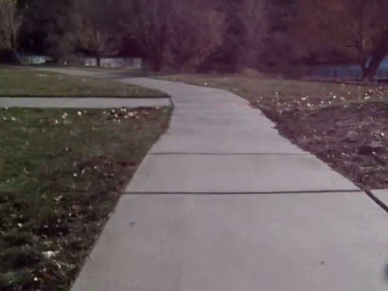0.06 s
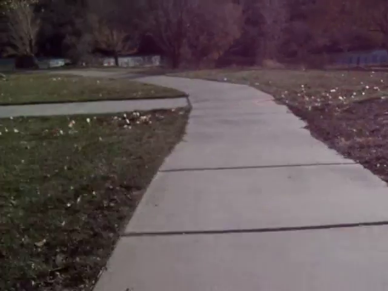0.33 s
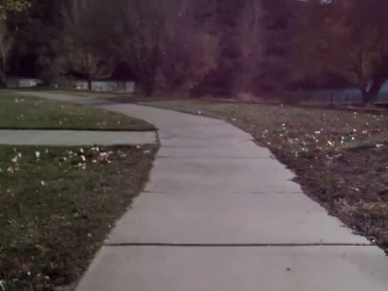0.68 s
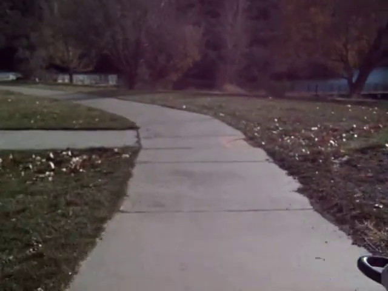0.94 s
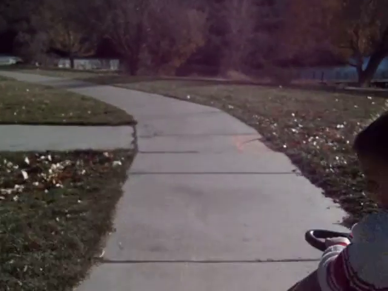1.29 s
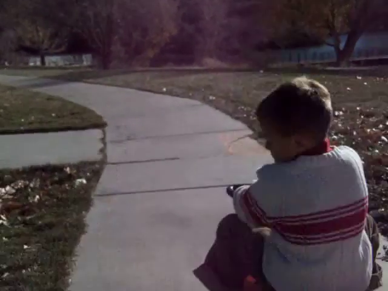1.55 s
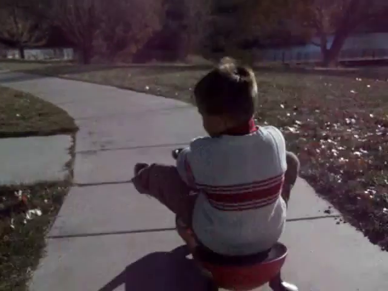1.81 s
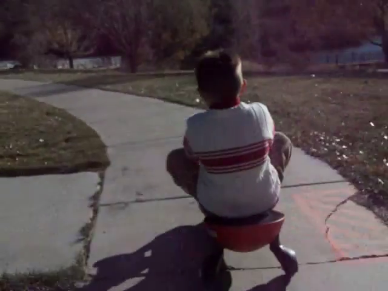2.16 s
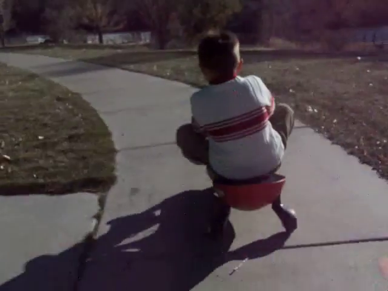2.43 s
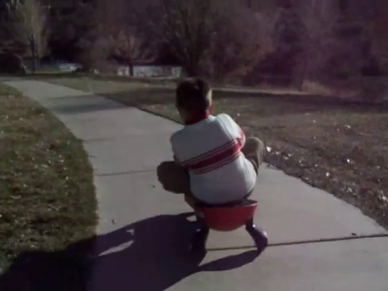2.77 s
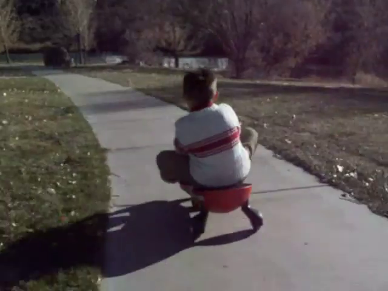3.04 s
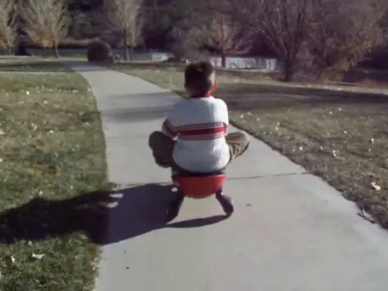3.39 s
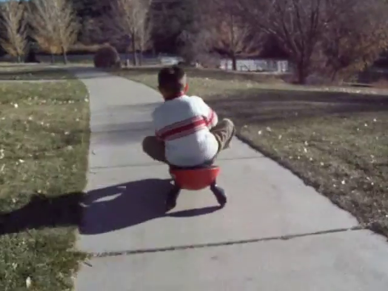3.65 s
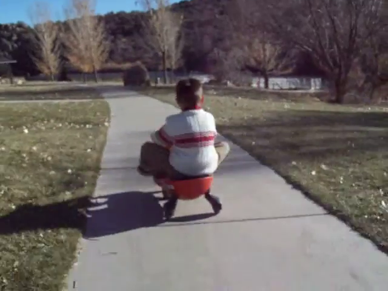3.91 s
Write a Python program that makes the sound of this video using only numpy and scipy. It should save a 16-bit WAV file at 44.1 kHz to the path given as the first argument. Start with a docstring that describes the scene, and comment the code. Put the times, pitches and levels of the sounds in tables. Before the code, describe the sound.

A plastic toy car rolls along a concrete path outdoors, close to the microphone. It starts with a knock, then its hollow body drones while the hard wheels rattle, crunch grit and clack over joints and pebbles.

```python
"""A child rides a plastic toy car along a concrete path, outdoors, close past the microphone.
It sets off with a knock and a burst of rattle from the hard wheels; within half a second the rough
concrete has the hollow body droning. Grit crackles under the wheels, most at about 1.5 s, as a little
wind touches the microphone. Joints and pebbles knock the car all the way, hardest from 2.5 to 3 s,
and the recorder ducks and clips on hard knocks."""
import sys
import numpy as np
from scipy import signal
from scipy.fft import rfft, irfft, next_fast_len
from scipy.io import wavfile
from scipy.ndimage import uniform_filter1d, map_coordinates

SR = 44100
rng = np.random.default_rng(int(sys.argv[2]) if len(sys.argv) > 2 else 0)


def generate_wav(signal):
    """Clip the signal to [-1, 1] and save it as 16-bit WAV at the path in sys.argv[1]."""
    frames = np.transpose(np.atleast_2d(signal))
    scaled = np.clip(frames, -1, 1) * 32767
    pcm = np.round(scaled).astype(np.int16)
    wavfile.write(sys.argv[1], SR, pcm)


N = 176400
BUMPS_PER_S = 2500  # contacts between wheels and rough concrete


def amp(db):
    """Decibels to gain."""
    return 10 ** (np.asarray(db) / 20)


def unit(x):
    """Scale to rms 1."""
    return x / np.sqrt(np.mean(x ** 2) + 1e-20)


def curve(rows):
    """Join (seconds, value) points into one value per sample."""
    return np.interp(np.arange(N) / SR, *np.transpose(rows))


def wobble(per_s):
    """A smooth curve through per_s random points a second."""
    return map_coordinates(rng.standard_normal(2000), [np.arange(N) * per_s / SR], mode="wrap")


def decaying(hits, decay_s):
    """Give every hit an exponential tail with time constant decay_s."""
    return signal.lfilter([1], [1, -np.exp(-1 / (decay_s * SR))], hits)


def filtered(x, response):
    """Filter x by a complex response, given as a function of Hz."""
    size = 2 * next_fast_len(len(x) // 2 + 4096)
    return irfft(rfft(x, size) * response(np.fft.rfftfreq(size, 1 / SR)), size)[:len(x)]


def coloured(x, points):
    """Pass x through a minimum-phase EQ drawn by (Hz, dB) points."""
    def response(hz):
        point_hz, point_db = np.transpose(points)
        gain = amp(np.interp(np.log(hz + 1), np.log(point_hz), point_db))
        cepstrum = irfft(np.log(gain))
        cepstrum[1:len(cepstrum) // 2] *= 2
        cepstrum[len(cepstrum) // 2 + 1:] = 0
        return np.exp(rfft(cepstrum))
    return filtered(x, response)


def resonated(x, modes):
    """Ring x through parallel (Hz, width in Hz, dB) resonances of alternating polarity."""
    def response(hz):
        return sum((-1) ** k * amp(db) * 1j * hz * width / (centre ** 2 - hz ** 2 + 1j * hz * width)
                   for k, (centre, width, db) in enumerate(modes))
    return filtered(x, response)


def impacts(per_s, spread_db):
    """Tiny impacts at random moments and of uneven size."""
    size = amp(spread_db * np.clip(rng.standard_normal(N), -2, 2)) * rng.choice([-1, 1], N)
    return size * (rng.random(N) < per_s / SR)


# The ring of the wheels and axles. Each row: centre in Hz, width in Hz, gain in dB.
WHEEL_MODES = [(678, 221, -1), (1038, 165, 2), (1265, 280, -3.5), (1612, 560, -7.5), (2390, 610, -12)]
# The rattle's fader: an opening burst, then a low ride. Each row: time in seconds, level in dB.
RATTLE_FADER = [(0, -15.5), (0.05, -40), (0.18, -29), (0.26, -26), (0.4, -21), (0.52, -26.5), (0.65, -28.5),
                (0.85, -26), (1.05, -24.5), (1.3, -26.5), (1.6, -22), (1.85, -30), (2.2, -27), (2.5, -26),
                (2.75, -25.5), (3, -24.5), (3.4, -26), (3.7, -28), (4, -26.5)]


def wheel_rattle(chatter, trim_db=-1.4):
    """Rough concrete shakes the hard wheels and axles, which ring in uneven flurries."""
    bumps = impacts(BUMPS_PER_S, spread_db=1.5)
    flutter_db = 1.74 * chatter + 1.7 * wobble(per_s=25.046)
    rattle = unit(resonated(bumps, WHEEL_MODES) * amp(flutter_db))
    return rattle * amp(curve(RATTLE_FADER) + trim_db)


# The boxy tone of the hollow body. Each row: centre in Hz, width in Hz, gain in dB.
BODY_MODES = [(189, 77, -16.5), (252.5, 54.5, -5), (339.3, 57.7, -.5), (400, 61.6, 0), (487, 110, -7.5),
              (601.4, 74, -13)]
# The drone's drift. Each row: time in seconds, pitch in Hz (only its ratio to the mean is played).
DRONE_DRIFT = [(0.35, 371.3), (0.55, 338.3), (0.8, 360.6), (1.5, 374.8), (2.0, 345.5), (2.75, 361.6),
               (3.3, 339.8), (3.9, 371.8)]
# The drone's fader: a quick swell that stays up. Each row: time in seconds, level in dB.
DRONE_FADER = [(0, -28), (0.08, -26), (0.21, -18), (0.38, -15.5), (0.58, -15.5), (0.85, -18.5), (0.95, -16),
               (1.05, -18), (1.29, -17.5), (1.5, -19), (1.82, -20), (1.93, -16.5), (2.02, -16.5),
               (2.08, -17), (2.26, -21.5), (2.35, -16.5), (2.7, -17.5), (3.02, -18), (3.26, -15),
               (3.38, -19), (3.5, -17), (3.58, -17), (3.78, -16.5), (4, -16)]


def body_drone(trim_db=-1.59):
    """Rough concrete keeps the hollow body droning, at a pitch that wanders as the car rolls."""
    drone = unit(resonated(impacts(BUMPS_PER_S, spread_db=2), BODY_MODES))
    pitch = curve(DRONE_DRIFT)
    drone = map_coordinates(drone, [np.cumsum(pitch / pitch.mean())], mode="mirror")  # varispeed
    running_rms = np.sqrt(np.abs(uniform_filter1d(drone ** 2, SR // 20)))
    return drone / running_rms * amp(curve(DRONE_FADER) + trim_db)


# The wind's low rumble. Each row: frequency in Hz, gain in dB.
WIND_EQ = [(15, -16), (40, -9.5), (85, -1.5), (150, -5), (260, -8), (600, -61.5)]
# The gusts. Each row: time in seconds, level in dB.
WIND_FADER = [(0, -45), (.37, -35), (.55, -46.5), (.8, -43.5), (1.1, -32.5), (1.5, -28.5), (1.88, -32.5),
              (1.99, -46), (2.4, -35), (2.7, -31), (3.05, -47), (4, -49)]
# The soft, dull bed of open air. Each row: frequency in Hz, gain in dB.
AIR_EQ = [(80, -3.5), (400, 9), (6000, -32)]


def wind_and_air(air_db=-34.5):
    """Lumpy wind buffets the microphone over a steady outdoor background."""
    rumble = coloured(rng.standard_normal(N), WIND_EQ)
    wind = unit(rumble * amp(3.3 * wobble(per_s=13)))
    air = unit(coloured(rng.standard_normal(N), AIR_EQ))
    return wind * amp(curve(WIND_FADER)) + air * amp(air_db)


# The crisp edge of crushed grit. Each row: frequency in Hz, gain in dB.
GRIT_EQ = [(900, -33), (2000, -1), (2800, 2.5), (3400, 8), (4000, 6.5), (5300, -4), (6300, -11),
           (7200, -13.5), (8500, -45)]
# The grit's fader, highest at 1.4 s. Each row: time in seconds, level in dB.
GRIT_FADER = [(0.15, -47.5), (0.33, -43.5), (1.4, -34), (1.64, -35.5), (1.79, -41), (4.0, -40)]


def grit_crackle(chatter, grains_per_s=3000, snaps_per_s=32, snap_db=-3, trim_db=2.5):
    """The chattering wheels grind fine grit, while single larger grains snap and crumble."""
    grains = impacts(grains_per_s, spread_db=0.5)
    fine = unit(coloured(grains, GRIT_EQ) * amp(2 * chatter))
    crumble = decaying(np.abs(impacts(snaps_per_s, spread_db=0.5)), decay_s=0.0026)
    snaps = unit(coloured(crumble * rng.standard_normal(N), GRIT_EQ))
    return (fine + amp(snap_db) * snaps) * amp(curve(GRIT_FADER) + trim_db)


# The wheel's midrange clack. Each row: frequency in Hz, gain in dB.
CLACK_EQ = [(350, -15.5), (650, 3), (1050, 3.5), (1400, 1.5), (1900, -2), (2400, -5), (3400, -46)]
# The grit's bright crack. Each row: frequency in Hz, gain in dB.
CRACK_EQ = [(1300, -25), (2300, -1.5), (2900, 1.5), (3800, 4.5), (4700, -3), (6000, -11), (8000, -23)]
# Hits on joints and pebbles. Each row: start in seconds, body thud, wheel clack and grit crack
# levels in dB before their trims, ring pitch in Hz, contact length in seconds.
KNOCK_CUES = [(0.009, -22, -28, -29, 940, 0.004), (0.217, -21.5, -31, -30, 4270, 0.0035),
              (0.442, -16.5, -15.5, -23, 3280, 0.002), (0.5647, -18, -16.5, -24.5, 980, 0.003),
              (0.581, -16.5, -15, -23, 1090, 0.0016), (0.671, -15.5, -43, -57, 870, 0.0061),
              (0.736, -20, -13, -23.5, 1056, 0.0043), (0.887, -33, -41, -27, 3120, 0.0033),
              (0.959, -16.5, -22, -25, 3580, 0.001), (1.067, -18.5, -24, -26, 2170, 0.0019),
              (1.191, -16.5, -18, -22.5, 3675, 0.0015), (1.35, -13, -17, -24.5, 1320, 0.003),
              (1.429, -18.5, -18, -26.5, 1080, 0.005), (1.637, -13, -20.5, -22.5, 3390, 0.0013),
              (1.714, -15, -34, -28.5, 1070, 0.0064), (1.752, -21.5, -18, -26.5, 1100, 0.0025),
              (1.763, -21, -25, -23.5, 1046, 0.0012), (1.785, -19, -16.5, -24.5, 1370, 0.0015),
              (1.873, -17, -37, -29.5, 3620, 0.0048), (2.035, -20, -26, -28, 3870, 0.0033),
              (2.085, -33, -23.5, -26.5, 4100, 0.00061), (2.139, -16.5, -18.5, -23.5, 1027, 0.0032),
              (2.147, -26, -19.5, -24.5, 1100, 0.0036), (2.206, -31.5, -15.5, -23, 1120, 0.0025),
              (2.333, -19, -17.5, -25, 990, 0.0045), (2.534, -11, -16, -19.5, 4120, 0.002),
              (2.542, -11, -16.5, -24.5, 1020, 0.0017), (2.66, -9, -19.5, -24.5, 1056, 0.0096),
              (2.7325, -23.5, -24.5, -23, 1160, 0.003), (2.746, -13.5, -16.5, -21.5, 1474, 0.0019),
              (2.807, -22, -27.5, -31.5, 1080, 0.0016), (2.872, -10, -12.5, -19, 1035, 0.0048),
              (2.9337, -15.5, -18.5, -21, 1024, 0.0065), (3.071, -11.5, -37.5, -38, 1040, 0.017),
              (3.111, -16, -19, -27, 970, 0.0011), (3.117, -25, -22, -30, 860, 0.002),
              (3.3157, -14, -19, -25.5, 4180, 0.0045), (3.427, -21, -24.5, -30.5, 3760, 0.0013),
              (3.551, -11.5, -15, -23.5, 1697, 0.0031), (3.694, -21.5, -21.5, -29, 980, 0.002),
              (3.8543, -19, -20.5, -17.5, 3590, 0.0015), (3.932, -22.5, -25, -31, 3890, 0.0057),
              (3.967, -14, -18, -26, 1067, 0.0068)]


def knocks(thud_trim_db=-0.7, clack_trim_db=-2.54, crack_trim_db=0.1, ring_trim_db=-6):
    """In a few ms of crunching contact the body thuds, the wheel clacks and rings, the grit cracks."""
    out = np.zeros(N + SR)
    t = np.arange(SR // 10) / SR

    def envelope(t60_s, hold_s=0, attack_s=0.00019):
        """Rise, hold, then fall 60 dB in t60_s."""
        return (1 - np.exp(-t / attack_s)) * amp(-60 * np.maximum(t - hold_s, 0) / t60_s)

    def at_level(x, db):
        """Give x the energy of 12 ms of sound at this rms level."""
        return x * amp(db) * np.sqrt(0.012 * SR / np.sum(x ** 2))

    tail = amp(-20) * envelope(t60_s=0.079)  # the loose plastic rattles on
    for start_s, thud_db, clack_db, crack_db, ring_hz, contact_s in KNOCK_CUES:
        thud_hz = 369.3 * np.exp(0.065 * rng.standard_normal())
        pressure = amp(4 * np.minimum(t / contact_s, 1))  # a contact presses harder towards its end
        crunch = pressure * rng.choice([-1, 1], (2, len(t)))
        thud = np.sin(2 * np.pi * thud_hz * t) * envelope(t60_s=0.021, hold_s=contact_s, attack_s=0.002)
        clack = coloured(crunch[0] * (envelope(t60_s=0.019, hold_s=contact_s) + tail), CLACK_EQ)
        crack = coloured(crunch[1] * (envelope(t60_s=0.027, hold_s=contact_s) + tail), CRACK_EQ)
        ring = np.sin(2 * np.pi * ring_hz * t) * envelope(t60_s=0.023)
        out[round(start_s * SR):][:len(t)] += (
            at_level(thud, thud_db + thud_trim_db)
            + at_level(clack, clack_db + clack_trim_db)
            + at_level(crack, crack_db + crack_trim_db)
            + at_level(ring, max(clack_db, crack_db) + ring_trim_db))
    return out[:N]


def wheel_hop(deepest_db=-4.5, recovery_s=0.035):
    """Gain of the rolling: the wheel hops after a knock, and the harder the clack the deeper the dip."""
    hits = np.zeros(N)
    for start_s, _, clack_db, *_ in KNOCK_CUES:
        hits[round(start_s * SR)] = amp(clack_db)
    hop = decaying(hits / hits.max(), recovery_s)
    return amp(deepest_db * np.minimum(hop, 1))


def scene():
    """The rolling car, its knocks and the open air, mixed in mono."""
    chatter = wobble(per_s=70)  # the wheels' chatter moves rattle and grit together
    rolling = body_drone() + wheel_rattle(chatter) + grit_crackle(chatter)
    return (rolling * wheel_hop() + knocks() + wind_and_air())[None]


MIC_TOP_HZ, TREBLE_SHELF_DB, CUTOFF_HZ = 8100, -6.5, 16000
DUCK_ABOVE_DB, DUCK_SHARE, DUCK_RELEASE_S = -13.5, 0.42, 0.031
MAKEUP_DB, CLIP_AT = 0.84, 0.71


def record(dry):
    """A narrow-band microphone feeds a recorder that ducks after loud moments, clips and loses treble."""
    x = filtered(dry[0], lambda hz: 1 / np.sqrt(1 + (hz / MIC_TOP_HZ) ** 60))
    level_db = 10 * np.log10(np.abs(uniform_filter1d(x ** 2, size=220)) + 1e-9)
    over_db = np.maximum(level_db - DUCK_ABOVE_DB, 0)
    release = np.arange(N) / SR / DUCK_RELEASE_S
    # Catch each peak and let it fall away exponentially.
    held_db = np.exp(np.maximum.accumulate(np.log(over_db + 1e-9) + release) - release)
    attack_window = np.hanning(SR // 60) / (SR // 120)
    duck_db = signal.lfilter(attack_window, 1, held_db) * DUCK_SHARE
    x = np.clip(x * amp(MAKEUP_DB - duck_db), -CLIP_AT, CLIP_AT)

    def treble_loss(hz):
        shelf = np.clip(10 * (hz / MIC_TOP_HZ - 1), 0, 1)  # full depth 10% above the microphone's band
        return (hz < CUTOFF_HZ) * amp(TREBLE_SHELF_DB * shelf)
    return filtered(x, treble_loss)[None]


dry = scene()
out = record(dry)
generate_wav(out)
```